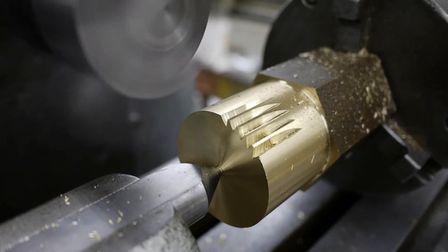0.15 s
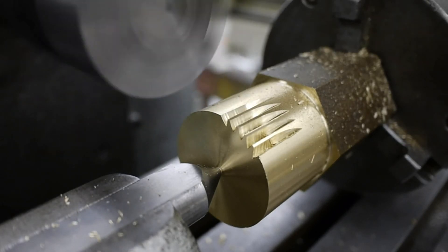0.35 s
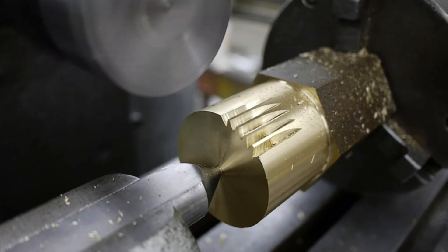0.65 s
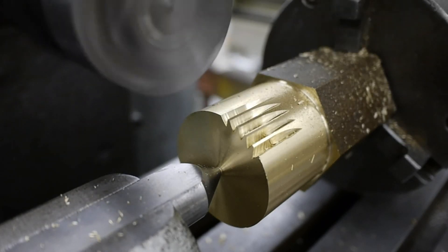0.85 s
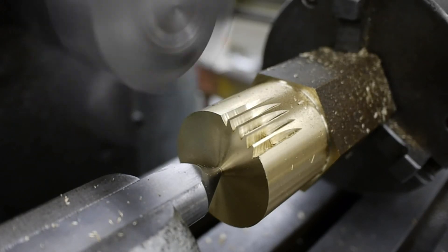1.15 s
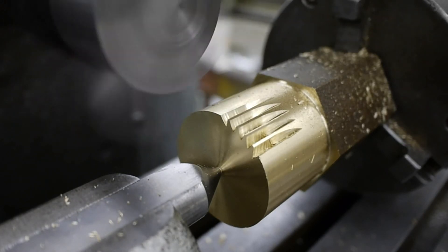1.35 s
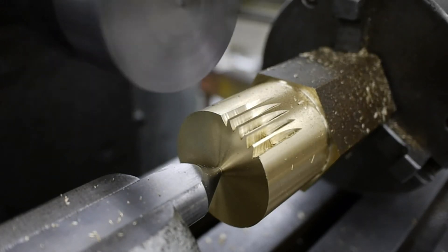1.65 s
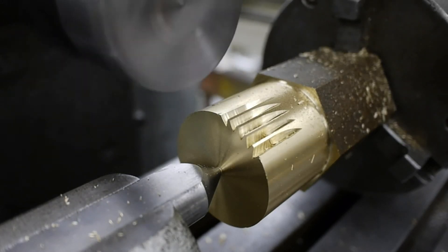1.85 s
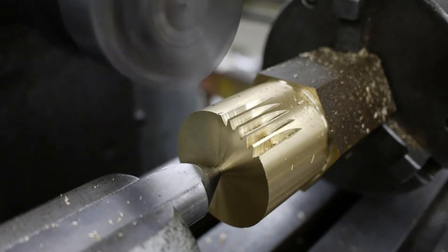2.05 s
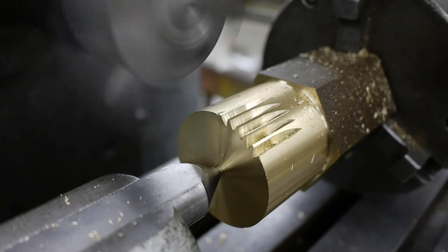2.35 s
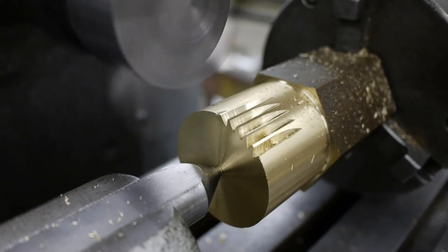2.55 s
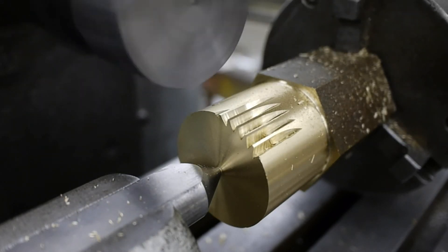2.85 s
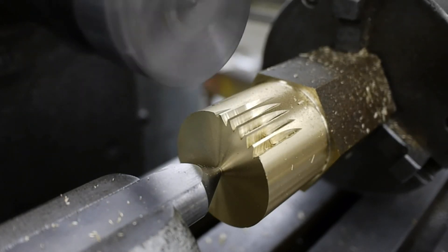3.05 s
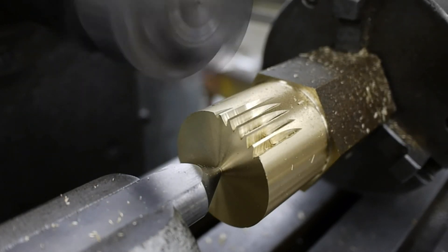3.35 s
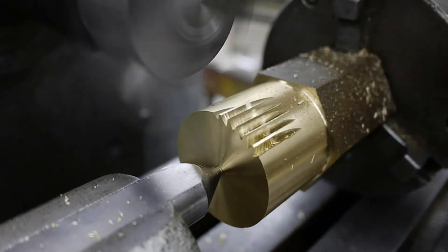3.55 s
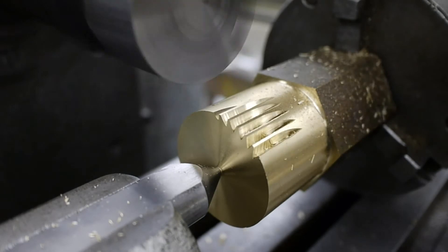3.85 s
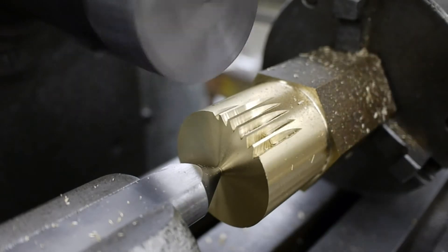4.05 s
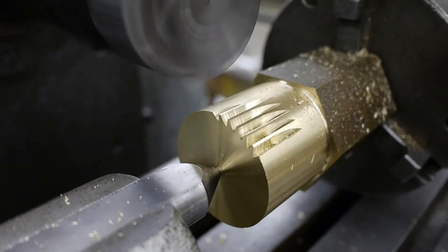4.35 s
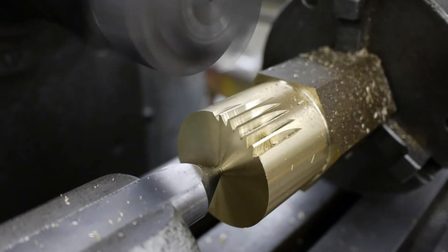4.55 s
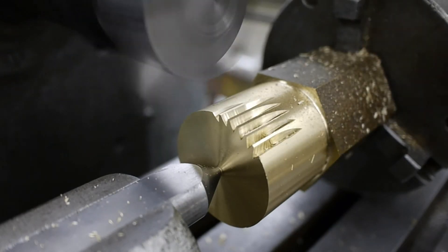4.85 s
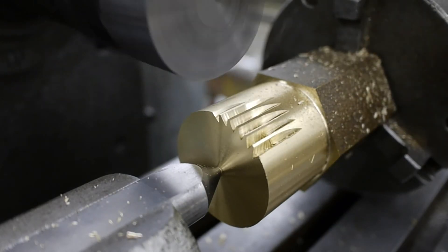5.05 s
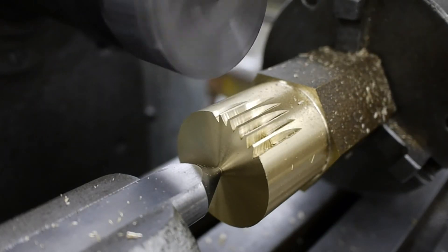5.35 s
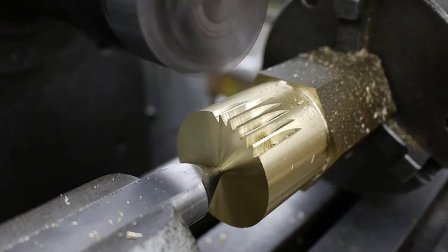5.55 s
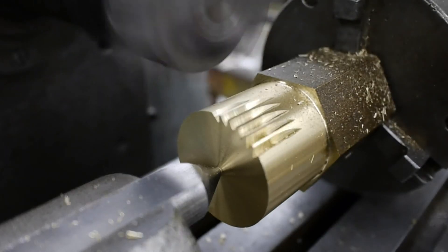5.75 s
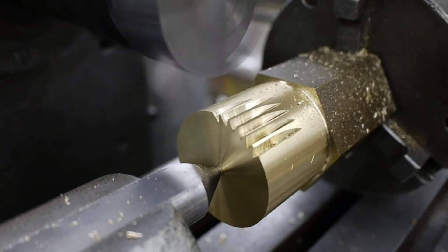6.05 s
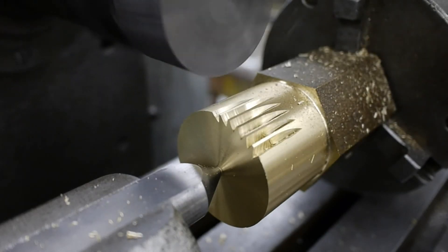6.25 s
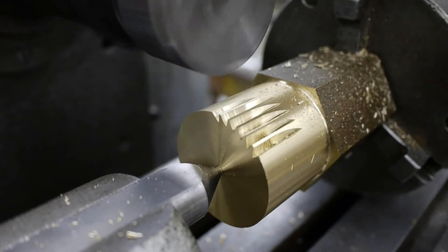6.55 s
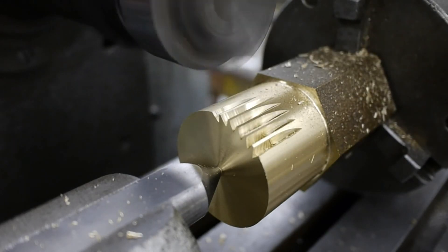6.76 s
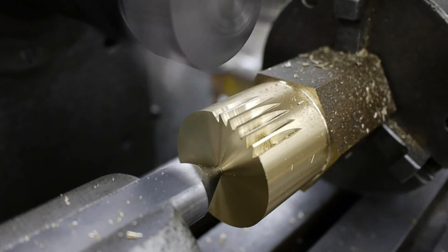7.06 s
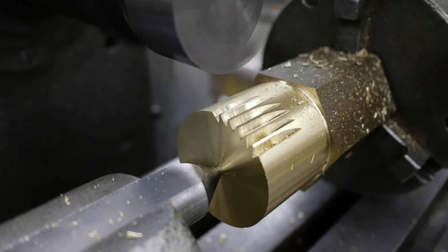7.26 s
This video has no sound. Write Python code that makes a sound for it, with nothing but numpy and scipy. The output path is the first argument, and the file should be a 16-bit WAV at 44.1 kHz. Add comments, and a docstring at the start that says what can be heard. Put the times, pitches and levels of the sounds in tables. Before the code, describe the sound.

A milling machine spins its cutter over a brass blank, heard close up in a workshop. A bright, ringing hiss and a high gear whine run throughout. A few sharp scratches come after about a second, then the gears buzz and rattle for a while. In the second half a dry slide gives short squeaks, the rattle returns, and the fixture knocks softly.

```python
"""A horizontal milling machine spins its cutter over a fluted brass blank, heard close up in mono.
From the start the drive gears whine, under a bright rubbing hiss that rings in the machine's metal.
After about a second come a few sharp scratches. Near 2 s the gear teeth start to slap and rattle,
easing off at 4 s. From about 5 s a dry slide sticks and slips in short squeaks; the rattle swells
again, and just after 6 s the fixture that holds the brass knocks softly."""
import sys
import numpy as np
from scipy import signal
from scipy.fft import rfft, irfft
from scipy.io import wavfile
from scipy.ndimage import uniform_filter1d

SR = 44100
rng = np.random.default_rng(int(sys.argv[2]) if len(sys.argv) > 2 else 0)


def bounce(signal):
    """Save signal as a 16-bit WAV file at the path given by the first command-line argument."""
    frames = np.transpose(np.atleast_2d(signal))
    limited = np.clip(frames, -1, 1)
    pcm = np.round(limited * 32767).astype(np.int16)
    wavfile.write(sys.argv[1], SR, pcm)


N = 326781
T = np.arange(N) / SR
MESH_HZ, RATTLE_HZ = 612.2, 70.86  # how often gear teeth meet, and how often they slap


def amp(db):
    """Turns decibels into a gain."""
    return 10 ** (np.asarray(db) / 20)


def unit(x):
    """Scales a signal to an average size (rms) of 1."""
    return x / np.sqrt(np.mean(x ** 2) + 1e-20)


def curve(rows):
    """Joins (time, value) points with straight lines."""
    return np.interp(T, *np.transpose(rows))


def add(mix, s, sound):
    """Mixes a sound in, starting at s seconds."""
    part = mix[round(s * SR):][:len(sound)]
    part += sound[:len(part)]


def drift(rate_hz):
    """A smooth random wobble of size 1, up to about the given rate."""
    hz = np.fft.rfftfreq(8192, 1 / 1000)
    slow = irfft(rfft(rng.standard_normal(8192)) / (1 + (hz / rate_hz) ** 2))
    return unit(np.interp(T, np.arange(len(slow)) / 1000, slow))


def burst(low_hz, high_hz, t60):
    """Noise that starts at once and dies away; t60 is the fade time, in seconds to drop 60 dB."""
    t = T[:SR // 4]
    band = signal.butter(4, [low_hz, high_hz], "band", fs=SR, output="sos")
    noise = rng.standard_normal(len(t))
    return signal.sosfilt(band, noise * amp(-60 * t / t60)) / np.std(signal.sosfilt(band, noise))


def workshop(x, wet_db=-7.5, t60=0.1):
    """Adds short echoes off the machine and nearby walls."""
    t = T[:SR // 3]
    echoes = rng.standard_normal(len(t)) * (rng.random(len(t)) < .1)
    echoes *= (t > .002) * amp(-60 * t / t60)
    return x + amp(wet_db) * signal.oaconvolve(x, echoes / np.linalg.norm(echoes))[:N]


# each knock: t/s, thud level/dB, body level/dB, clack level/dB
KNOCKS = [(6.15, -73, -54, -36), (6.304, -80, -52, -55), (6.351, -75, -46, -34), (6.369, -73, -58, -39),
          (6.434, -64, -51, -26), (6.448, -75, -61, -36), (6.507, -78, -57, -45)]
# the thud, body and clack: lowest f/Hz, highest f/Hz, fade time/s
KNOCK_BANDS = [(215, 360, 0.074), (536, 1070, 0.11), (1200, 4900, 0.05)]


def knocks():
    """Dull blows that die quickly in the heavy fixture."""
    out = np.zeros(N)
    for s, *parts_db in KNOCKS:
        for db, (low_hz, high_hz, t60) in zip(parts_db, KNOCK_BANDS):
            add(out, s, amp(db) * burst(low_hz, high_hz, t60))
    return out


# each scratch: t/s, fade time/s, level/dB
SCRATCHES = [(1.0778, .012, -13.5), (1.0848, .008, -15), (1.086, .2, -22), (1.4877, .002, -11)]


def ticks_and_scratches(per_s=40, level_db=-46, spread_db=3):
    """Tiny gritty ticks at random, and a few sharper scratches."""
    clicks = (rng.random(N) < per_s / SR) * amp(spread_db * np.minimum(rng.exponential(1, N), 3))
    tick = burst(low_hz=3500, high_hz=15800, t60=0.0027)
    out = amp(level_db) * unit(signal.oaconvolve(clicks, tick)[:N])
    for s, t60, db in SCRATCHES:
        add(out, s, amp(db) * burst(low_hz=3760, high_hz=16200, t60=t60))
    return out


# a typical faint slip: level/dB of harmonics 1, 2, 3 (tones at 1, 2, 3 times the pitch)
SLIP_DB = [-52, -44, -43]


def faint_slips(count=22, start_s=4.75, end_s=7.1, low_hz=2153, high_hz=2750, length_s=.02,
                fall=0.063, spread_db=6):
    """Weak, falling squeaks at random while the slide moves, as rows like those of SQUEAKS."""
    rows = []
    for when, pitch, strength in rng.random((count, 3)):
        s = start_s + when * (end_s - start_s)
        hz = low_hz + pitch * (high_hz - low_hz)
        harmonics_db = np.array(SLIP_DB) + spread_db * (strength - .5)
        rows.append((s, length_s, hz, (1 - fall) * hz, *harmonics_db))
    return rows


# each squeak: t/s, length/s, start f/Hz, end f/Hz, relative level/dB of harmonics 1, 2, 3
SQUEAKS = [(5.029, .012, 2270, 2290, -50, -31.5, -51), (5.087, 0.018, 2470, 2460, -34, -37, -46),
           (5.118, .045, 2280, 2295, -50, -35, -36), (5.754, 0.029, 2586, 2420, -33.5, -34, -34),
           (5.785, 0.017, 2350, 2260, -39, -33, -24.5), (5.822, 0.0099, 2015, 2100, -45, -31, -34),
           (5.828, 0.02, 2330, 2380, -53, -42, -26.5), (5.891, 0.012, 2290, 2170, -36.5, -43, -43),
           (5.971, 0.024, 1917, 1810, -37.5, -33, -41), (6.577, .021, 2230, 2120, -45, -35, -36),
           (6.616, 0.037, 2260, 2000, -42, -38, -36), (6.704, 0.013, 1870, 1770, -42.5, -37, -26),
           (6.722, .024, 1940, 1970, -46, -33, -44), (6.739, 0.0092, 2040, 1760, -45, -41, -29),
           (6.762, .015, 1747, 1630, -40, -41, -27), (6.778, 0.0085, 1470, 1200, -46, -45, -47),
           (6.944, 0.01, 2600, 2440, -32.5, -32, -26), (6.977, .014, 1700, 1570, -44, -50, -46),
           (6.9957, 0.0136, 1750, 1490, -38.5, -37, -22.5), (7.078, .007, 2430, 2400, -37, -45, -46),
           (7.245, 0.042, 2106, 2104, -44, -31, -26.5)]


def squeaks(arch=0.033, rough_db=1.5, level_db=-0.74, fade_db=4, shake=0.017, rasp=0.26,
            low_cut_hz=900, edge_s=.0012):
    """The dry slide sticks and slips in raspy chirps; shorter ones bend and shake more in pitch."""
    wobble, grip = shake * drift(rate_hz=200), amp(rough_db * drift(rate_hz=530))
    scrape = rasp * (drift(rate_hz=480) + 1j * drift(rate_hz=400))  # roughens level and phase
    out = np.zeros(N)
    for s, length, start_hz, end_hz, *harmonics_db in SQUEAKS + faint_slips():
        progress = np.linspace(0, 1, round(length * SR))
        span = (round(s * SR) + np.arange(len(progress))) % N
        bend = min(1, 0.0089 / length) * (arch * np.sin(np.pi * progress) + wobble[span])
        pitch_hz = (start_hz + (end_hz - start_hz) * progress) * (1 + bend)
        phase = 2 * np.pi * np.cumsum(pitch_hz) / SR
        envelope = amp(level_db + fade_db * (.5 - progress))
        envelope *= signal.windows.tukey(len(progress), 2 * edge_s / length)
        tone = sum(amp(db) * np.exp(1j * k * phase) for k, db in enumerate(harmonics_db, 1))
        add(out, s, np.sqrt(2) * envelope * (tone * (1 + scrape[span])).imag)
    low_cut = signal.butter(4, low_cut_hz, "high", fs=SR, output="sos")
    return signal.sosfilt(low_cut, out * grip)


# two spells of buzzing from the slack between lightly loaded gears: t/s, relative level/dB
BUZZ_LEVEL = [(0, -75), (1.7, -61.5), (2.3, -52.5), (3.75, -49.5), (4.1, -63), (5, -68), (5.5, -53),
              (6.6, -54), (6.9, -64)]
# the notes that ring in the buzz: f/Hz, fade time/s, relative level/dB
BUZZ_NOTES = [(1350, 0.016, -3.5), (1530, 0.02, -10.5), (1707, 0.025, 0)]
# the notes of the lower growl: f/Hz, fade time/s, relative level/dB
GROWL_NOTES = [(784, 0.11, -3), (878, 0.034, 9.5), (1071, 0.081, -1)]


def gear_rattle(clock, buzz_db=1, uneven_db=1.4, low_cut_hz=720, build_up_s=0.0011):
    """Gear teeth slap once a turn and ring the casing, which gives off no bass."""
    slaps = np.diff(np.floor(clock * RATTLE_HZ), prepend=0) * amp(uneven_db * rng.standard_normal(N))
    slaps = signal.sosfilt(signal.butter(6, low_cut_hz, "high", fs=SR, output="sos"), slaps)
    t, out = T[:SR // 20], np.zeros(N)
    growl_db = np.interp(T, [1.6, 3.9], [-81, -65.5])  # the growl swells once and stays
    for notes, level_db in (BUZZ_NOTES, buzz_db + curve(BUZZ_LEVEL)), (GROWL_NOTES, growl_db):
        ring = sum((-1) ** k * amp(db - 60 * t / t60) * np.sin(2 * np.pi * hz * t)
                   for k, (hz, t60, db) in enumerate(notes))
        ring *= 1 - np.exp(-t / build_up_s)
        out += unit(signal.oaconvolve(slaps, ring)[:N]) * amp(level_db)
    return out


# how hard the parts rub, given as the loudness of the hiss: t/s, level/dB
RUBBING = [(0.0, -25.5), (1.17, -26), (1.44, -24.5), (1.53, -27.8), (1.7, -25.5), (1.76, -27.5),
           (2.46, -25.5), (2.49, -26.5), (3.43, -27), (4.45, -28.5), (4.71, -30.5), (5.13, -27),
           (5.18, -30), (5.51, -27), (5.6, -28.5), (5.75, -27), (6.45, -29.5), (6.78, -32.5), (6.85, -29.5),
           (7.4, -30)]


def pressure():
    """How hard the parts rub, in dB above or below the average."""
    return curve(RUBBING) - curve(RUBBING).mean()


# tones of the meeting gear teeth: multiple of MESH_HZ, relative level/dB
GEAR_TONES = [(1, -72.6), (2, -62.4), (3, -59), (4, -52.6), (5, -45.9), (6, -42.7), (7, -62.7), (8, -48.7),
              (9, -44.2), (10, -60.2), (11, -38.0), (12, -43.2), (13, -49.2), (14, -52.2), (15, -40.7),
              (17, -51.8), (18, -52.9), (19, -46.9), (20, -47), (21, -50.4), (22, -54.3)]
# other steady tones of the drive: f/Hz, relative level/dB
DRIVE_TONES = [(578.5, -81.4), (1202.8, -63), (1517.1, -68.0), (2704.7, -56.6), (2724.4, -49.1),
               (3256.7, -58.7), (3460.6, -53.9), (3600.0, -46.3), (3688.4, -51.9), (3762.5, -54.7),
               (5167.5, -45.7), (5238.1, -50.3), (5274.5, -47.4), (5453.2, -48.1), (5508.7, -46.5),
               (5643.8, -47.8), (6088.4, -48.7), (6306.6, -43.4)]
# swell of the low tones: t/s, added level/dB
HUM = [(0, 0), (2.9, 0.5), (3.6, 2.5), (4.7, -0.5), (6.3, 0), (6.95, 3.5), (7.41, 3.5)]
# a high whistle of the gears: t/s, relative level/dB
WHISTLE = [(0, -31.5), (1.45, -33.5), (1.95, -37), (2.35, -34.5), (3.15, -33.5), (3.4, -42.5), (4.4, -39),
           (4.72, -44), (5.6, -40), (7.41, -41)]


def gear_whine(clock, level_db=-1.5, waver_db=2.05, blur=0.29, beat_hz=0.755, beat_depth=0.48,
               follow=1.62):
    """The gears and drive sing in wavering tones; the upper ones grow with the rubbing."""
    tones = [(k * MESH_HZ, db) for k, db in GEAR_TONES] + list(DRIVE_TONES)
    load_db, hum_db, out = follow * pressure(), curve(HUM), np.zeros(N)
    for hz, db in tones:
        phase = 2 * np.pi * (hz * clock + rng.random()) + blur * drift(rate_hz=4.6)
        upper = np.interp(hz, [1900, 2700], [0, 1])  # 0 for low tones, 1 for high ones
        swell_db = upper * load_db + (1 - upper) * hum_db
        tone = amp(level_db + db + swell_db + waver_db * drift(rate_hz=3.1)) * np.sin(phase)
        if hz == MESH_HZ:  # the lowest gear tone pulses slowly
            tone *= 1 + beat_depth * np.cos(2 * np.pi * beat_hz * (T - .3))
        out += tone
    whistle = np.sin(2 * np.pi * 16 * MESH_HZ * clock)
    out += whistle * amp(level_db + curve(WHISTLE) + waver_db * drift(rate_hz=13))
    return np.sqrt(2) * out


# the hiss from bass to treble: f/Hz, relative level/dB
HISS_COLOUR = [(20, -58), (100, -60), (150, -56), (260, -60.5), (335, -50.5), (460, -51), (560, -45.5),
               (1000, -39), (1250, -29), (2300, -26.5), (2600, -18), (4300, -14.5), (6200, -12),
               (7600, -11.5), (10000, -11), (15500, -11.5)]
# where the casing and cutter shaft ring: f/Hz, width/Hz, added level/dB
METAL_RINGS = [(830, 34, 11.5), (1513, 56, 9), (2154, 167, 8.5), (2492, 108, 9.5), (2700, 120, 6),
               (3260, 280, 4), (3725, 270, 6), (4600, 56, 8.5), (5220, 290, 6), (5620, 150, 6.5),
               (5570, 130, 0.5), (6193, 510, 8), (6550, 150, 5), (6960, 41, 6.5), (8940, 3300, 5)]


def rubbing_hiss(clock, ring_db=-1.59, body_db=-51.0, ripple_db=1.8, flicker_db=0.89, tooth_depth=0.08,
                 ring_flicker_db=1, ring_swell_db=0.17, ring_follow=1.07, body_follow=0.5):
    """Rubbing noise rings in the metal, follows the pressure and pulses with the teeth and shafts."""
    hz = np.fft.rfftfreq(N, 1 / SR)
    points_hz, points_db = np.transpose(HISS_COLOUR)
    colour_db = np.interp(np.log(hz + 1), np.log(points_hz), points_db)
    colour_db += sum(db / (1 + (2 * (hz - f) / width) ** 2) for f, width, db in METAL_RINGS)
    # countless small rings and echoes add little peaks and dips
    colour_db += ripple_db * unit(uniform_filter1d(rng.standard_normal(len(hz)), size=350))
    spectrum = rfft(rng.standard_normal(N)) * amp(colour_db)
    low, ringing, high = hz < 2400, (hz > 5100) & (hz < 7200), hz > 7700
    body = unit(irfft(spectrum * low, N)) * amp(body_db + body_follow * pressure())
    unsteady_db = ring_flicker_db * drift(rate_hz=230) + ring_swell_db * drift(rate_hz=4.6)
    ring = unit(irfft(spectrum * ringing, N))
    ring *= amp(ring_db + curve(RUBBING).mean() + ring_follow * pressure() + unsteady_db)
    fizz = irfft(spectrum * ~(low | ringing), N)
    fizz *= amp(curve(RUBBING)) / np.std(irfft(spectrum * high, N))  # its treble sets the level
    turn = 2 * np.pi * clock
    shaft_pulse = .045 * sum(np.cos(k * RATTLE_HZ * turn) for k in (.5, 1, 2))
    throb = 1 + tooth_depth * np.cos(MESH_HZ * turn) + shaft_pulse
    flicker = drift(rate_hz=13)
    flicker -= uniform_filter1d(flicker, size=SR // 3)  # keep only the quick changes
    return (body + ring + fizz) * throb * amp(flicker_db * flicker)


def spindle_time(wander=0.0002234, flutter=0.00028):
    """Time as the shafts count it: their speed wavers very slightly."""
    return T + np.cumsum(wander * drift(rate_hz=2.056) + flutter * drift(rate_hz=17)) / SR


def scene():
    """The running machine and its small noises, the same in both channels."""
    clock = spindle_time()
    machine = gear_whine(clock) + rubbing_hiss(clock) + gear_rattle(clock)
    mono = machine + ticks_and_scratches() + workshop(squeaks() + knocks())
    return np.array([mono, mono])


def record(dry):
    """Fades both ends for a few milliseconds and cuts off the highest treble."""
    faded = dry * signal.windows.tukey(N, .001)
    treble_cut = signal.firwin(1023, cutoff=15790, window=("kaiser", 9), fs=SR)
    return signal.oaconvolve(faded, treble_cut[None], "same")


dry = scene()
out = record(dry)
bounce(out)
```